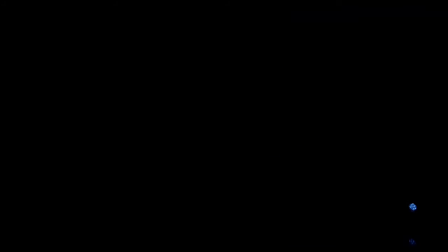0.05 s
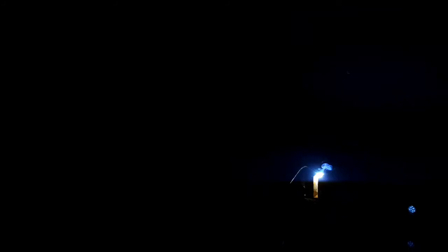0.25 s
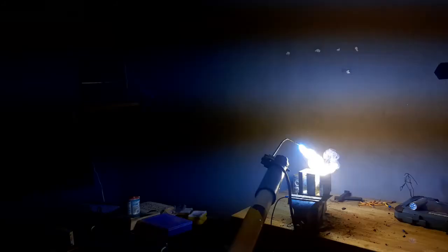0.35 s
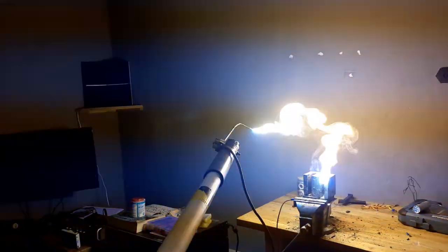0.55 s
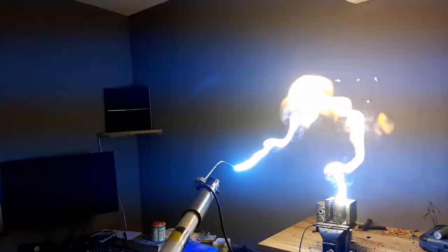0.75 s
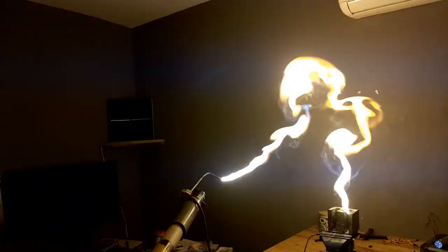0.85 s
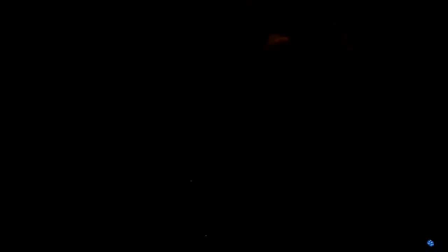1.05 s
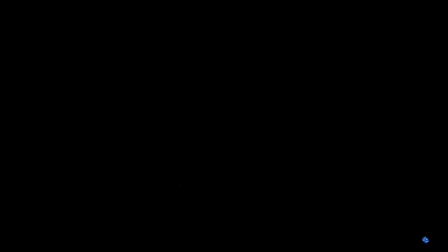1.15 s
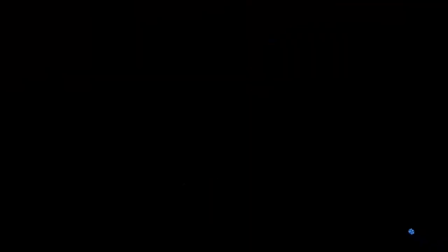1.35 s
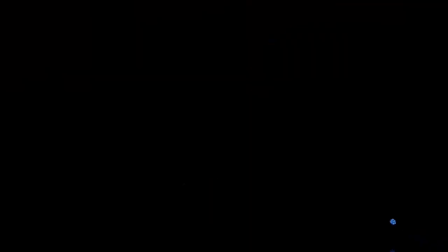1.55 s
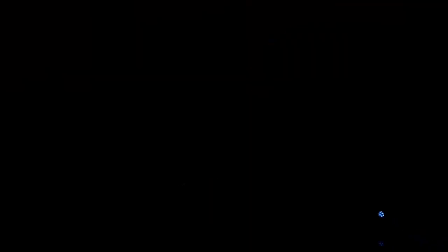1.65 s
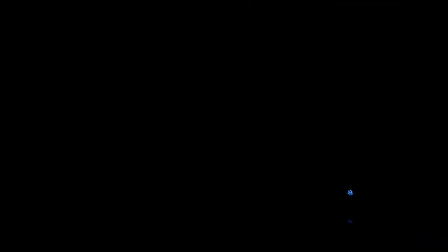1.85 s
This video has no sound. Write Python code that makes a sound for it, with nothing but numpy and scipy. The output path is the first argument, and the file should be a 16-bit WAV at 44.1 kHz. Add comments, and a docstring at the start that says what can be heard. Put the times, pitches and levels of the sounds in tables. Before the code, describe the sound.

High-voltage arc spitting, swelling into a low buzzing hum, then breaking off abruptly.

```python
"""A harsh spitting crackle as a high-voltage arc is struck in a small workshop. Drawn out, the arc grows
into a flame that hums at twice the mains frequency, its channel shrinking at every current zero. It
flutters and breaks, and the room's low modes ring on. A puff, a tick and faint rustles follow, over a
quiet transformer, a fan, room air and hiss."""
import sys
import numpy as np
from scipy import signal
from scipy.fft import rfft, irfft, next_fast_len
from scipy.io import wavfile
from scipy.ndimage import map_coordinates

SR = 44100
rng = np.random.default_rng(int(sys.argv[2]) if len(sys.argv) > 2 else 0)


def to_wav(sig):
    """Store sig (one row per channel, or 1-D mono) as 16-bit WAV at the path in sys.argv[1].

    Samples outside -1..1 are clipped; the rate is SR.
    """
    pcm = np.clip(np.atleast_2d(sig), -1, 1) * 32767
    pcm = np.round(pcm).astype(np.int16)
    wavfile.write(sys.argv[1], SR, pcm.T)  # frames by channels


N = 83790
T = np.arange(N) / SR

PULSE_HZ, CURRENT_ZERO_S = 100.0, .2176
STRIKE_S, BREAK_S, BREAK_FADE_S = .2155, .911, .021
DRAW_START_S, DRAW_END_S = 0.4, 0.66

# Each row: time in seconds, fundamental in dB, octave in dB.
HUM_LEVELS = [(0.215, -55, -49), (0.279, -33.5, -31), (0.307, -42, -34), (0.411, -24.5, -32.5),
              (0.459, -23, -36), (0.619, -13.5, -40), (0.797, -13, -26.5), (0.813, -11, -32.5),
              (0.895, -13.5, -26.5), (0.915, -15, -21.5)]
# Each row: time in seconds, level of the upper harmonics in dB.
BUZZ_LEVELS = [(.215, -57), (.255, -42.5), (.31, -46.5), (.37, -35), (.43, -30.5), (.55, -27), (.75, -25),
               (.84, -31), (.915, -26)]
# Each row, from harmonic 3 up: short-arc gain in dB, long-arc gain in dB.
BUZZ_HARMONICS = [(5, -1), (-1.5, -3.5), (-22.5, -12.5), (-7, -29), (-27, -21.5), (-29, -27.5), (-13, -31),
                  (-20.5, -34), (-26.5, -33.5), (-26.5, -36)]
WAVER_DB, WAVER_PER_HARMONIC_DB, JITTER_S, BLUR_PER_HARMONIC_RAD = 0.7, 0.21, .00002, .22


def arc_hum():
    """The hot channel shrinks at each current zero: pressure dips whose harmonics shift as it lengthens."""
    phase = 2 * np.pi * PULSE_HZ * (T - CURRENT_ZERO_S + JITTER_S * wobble(60))

    def harmonic(k, pan_db=-0.7):
        """One wavering multiple of the hum; reflections blur its phase above the octave."""
        blur = BLUR_PER_HARMONIC_RAD * max(k - 2, 0) * (rng.normal() + .3 * wobble(5))
        waver = amp((WAVER_DB + WAVER_PER_HARMONIC_DB * k) * wobble(35))
        return -waver * stereo_tone(k * PULSE_HZ, k * phase + blur, pan_db)

    fundamental_db, octave_db = curves(HUM_LEVELS)
    buzz_db, = curves(BUZZ_LEVELS)
    buzz = sum(amp(buzz_db + short_db + (long_db - short_db) * drawn_out()) * harmonic(k)
               for k, (short_db, long_db) in enumerate(BUZZ_HARMONICS, 3))
    hum = amp(fundamental_db) * harmonic(1, pan_db=-1.35) + amp(octave_db) * harmonic(2)
    return burning() * (hum + buzz)


# Each row: time in seconds, crackle in dB, fizz in dB.
SPARK_LEVELS = [(.215, -30, -16), (.24, -26, -25), (.3, -33, -29), (.335, -32, -40.5), (.38, -35, -32),
                (.47, -38, -29.5), (.53, -36, -37.5), (.6, -50, -54.5), (.66, -68, -46),
                (.73, -48.5, -43.5), (.82, -55.5, -48), (.9, -61.5, -66), (.93, -75, -52)]
SNAPS = [(0.2164, 3, -14), (0.3099, -6.5, -0.5), (0.3267, 5.5, -8), (0.3313, -3.5, -24.5), (.925, -32, -30)]
# Each row: frequency in Hz, relative level in dB.
CRACKLE_SPECTRUM = [(120, -8), (500, -5.5), (800, -5), (1000, 1), (1250, -7.5), (1500, 2.5), (2100, -1),
                    (3000, -6), (4200, -4.5), (7500, -5.5), (9000, -32.5), (16000, -20)]
FIZZ_SPECTRUM = [(800, -34.5), (2500, -16), (3800, -4), (5200, -6.5), (6200, -2.5), (7700, -4), (8500, -18),
                 (9700, -15), (11400, -7), (13500, -7), (15700, -4)]
SHORT_ARC_SPARKS_PER_S, LONG_ARC_SPARKS_PER_S = 4000, 900
SIZE_SPREAD_DB, SPURT_DB, BUNCH_DB, SPARK_WET_DB = 1, 1.15, 8, 7.5


def sparks():
    """Tiny discharges come in spurts and bunch round each re-ignition; a few snaps stand out."""
    rate = SHORT_ARC_SPARKS_PER_S * (LONG_ARC_SPARKS_PER_S / SHORT_ARC_SPARKS_PER_S) ** drawn_out()
    impulses = (rng.random(N) < rate / SR) / np.sqrt(rate)  # same power at any rate
    sizes = amp(SIZE_SPREAD_DB * np.minimum(rng.exponential(size=N), 4)) * rng.choice([-1, 1], N)
    bunch_db = BUNCH_DB * np.cos(2 * np.pi * PULSE_HZ * (T - CURRENT_ZERO_S))
    train = burning() * unit(impulses * sizes * amp(SPURT_DB * wobble(55) + bunch_db))
    crackle, fizz = [train * amp(db) for db in curves(SPARK_LEVELS)]
    for start_s, crackle_db, fizz_db in SNAPS:
        crackle[round(start_s * SR)] += amp(crackle_db)
        fizz[round(start_s * SR)] += amp(fizz_db)
    return (pan(db=-0.74) * room(colour(-crackle, CRACKLE_SPECTRUM), SPARK_WET_DB)
            + pan(db=-1.5) * room(colour(-fizz, FIZZ_SPECTRUM), SPARK_WET_DB))


# Each row: peak time in seconds, level in dB, rise and fall in seconds.
FLUTTERS = [(.238, -39.5, 0.0048, 0.028), (.47, -36.5, 0.09, 0.14), (.718, -23.5, 0.013, 0.012),
            (.922, -30.5, 0.039, 0.015)]
# Each row: frequency in Hz, relative level in dB.
FLAME_SPECTRUM = [(30, -11.5), (70, -5), (140, 0.5), (300, 2), (480, 3.5), (750, -10.5), (1400, -16.5),
                  (2500, -42.5), (8000, -71.5)]


def flame_flutter():
    """The flame roars briefly when it twists and when it tears."""
    return pan(db=-0.7) * room(swells(FLUTTERS) * noise(FLAME_SPECTRUM), wet_db=-3)


# Each row: frequency in Hz, level in dB, T60 in seconds.
ROOM_MODES = [(77.2, -37.5, 0.56), (99.5, -19.5, 0.36), (103, -21.5, 0.34), (205.3, -28, 0.3),
              (225, -34.5, .45), (295.3, -37, 0.29), (321.4, -33.5, 0.28), (400, -35.5, 0.25),
              (500, -46, .22), (621, -44.5, .22), (920, -49, 0.31)]
RING_RISE_S = 0.005


def room_ring():
    """The room's low modes die away after the break; the close pair round the hum beats."""
    age_s = np.maximum(T - BREAK_S - BREAK_FADE_S, 0)
    ring = sum((-1) ** k * amp(db - 60 * age_s / t60) * stereo_tone(hz, 2 * np.pi * hz * age_s, -1.35)
               for k, (hz, db, t60) in enumerate(ROOM_MODES))
    return ring * np.clip(age_s / RING_RISE_S, 0, 1)


# Each row: peak time in seconds, level in dB, rise and fall in seconds.
RUSTLES = [(1.001, -47, 0.0025, 0.029), (1.2, -64, 0.11, .08), (1.43, -56.5, 0.093, .03)]
TICKS = [(1.085, -54, .0004, .003)]
# Each row: frequency in Hz, relative level in dB.
RUSTLE_SPECTRUM = [(200, -7), (900, -0.5), (1800, -3.5), (3000, -11.5), (4500, -13.5), (7400, -19.5),
                   (8600, -40), (15000, -45.5)]
TICK_SPECTRUM = [(1000, -14), (3000, -2), (4500, -6), (7400, 6), (8600, -30), (15000, -22)]


def rustles_and_tick():
    """A puff, a light tick and faint rustling once the arc is out."""
    rustles = room(swells(RUSTLES) * noise(RUSTLE_SPECTRUM), wet_db=2)
    tick = room(swells(TICKS) * noise(TICK_SPECTRUM), wet_db=0)
    return rustles + tick


# Each row: time in seconds, air level in dB, transformer gain in dB.
BACKGROUND_LEVELS = [(0, -46, 4), (.21, -48.5, 3), (.4, -48, 7), (1.16, -52.5, -5.5), (1.25, -54, -2.5),
                     (1.6, -55, -1), (1.9, -51.5, -3)]
# Each row: time in seconds, level in dB.
HISS_LEVELS = [(0, -72.5), (.21, -70), (1.1, -67), (1.3, -73.5), (1.65, -79.5), (1.9, -78)]
# Each row: frequency in Hz, relative level in dB.
TRANSFORMER_TONES = [(100.1, -48.5), (200, -60.5), (1513, -78)]
FAN_TONES = [(171.8, -53), (343, -60.5), (514, -68), (676, -76), (852, -74.5)]
AIR_SPECTRUM = [(15, -72.5), (25, -42.5), (64, -38), (87, -15), (114, -8), (134, -22.5), (175, -8),
                (301, -17), (344, -24.5), (427, -16.5), (463, -21.5), (818, -25), (988, -28.5), (1100, -29),
                (16000, -83)]
HISS_SPECTRUM = [(1500, -26.5), (3200, -12.5), (4300, -1), (7000, -5), (8500, -27), (12000, -11),
                 (15700, -13.5)]
FAN_SAG_FRACTION, FAN_RECOVERY_S = .09, .2


def background():
    """A transformer hums; a fan slows under the arc's load and recovers; room air and thin hiss."""
    air_db, transformer_db = curves(BACKGROUND_LEVELS)
    hiss_db, = curves(HISS_LEVELS)
    transformer = amp(transformer_db) * tones(TRANSFORMER_TONES, T)
    load = np.clip((T - STRIKE_S) / (BREAK_S - STRIKE_S), 0, 1)
    load *= np.exp(-np.maximum(T - BREAK_S, 0) / FAN_RECOVERY_S)
    fan_clock_s = np.cumsum(1 - FAN_SAG_FRACTION * load) / SR
    fan = amp(air_db - air_db[-1]) * tones(FAN_TONES, fan_clock_s)
    air = unit(noise(AIR_SPECTRUM) + 1.8 * np.array([noise(AIR_SPECTRUM), noise(AIR_SPECTRUM)]))
    hiss = np.array([noise(HISS_SPECTRUM), noise(HISS_SPECTRUM)])
    return pan(db=-1.27) * (transformer + fan + amp(air_db) * air + amp(hiss_db) * hiss)


# Each row: frequency in Hz, T60 in seconds.
ROOM_DECAY = [(100, .45), (500, 0.44), (2000, 0.45), (6000, 0.28), (15000, 0.41)]
LEFT_DELAY_S = .00009


def room(x, wet_db):
    """Direct sound reaches the nearer, right microphone first; each side has its own diffuse tail."""
    hz, t, spectra = signal.stft(rng.standard_normal((2, SR // 2)), SR, nperseg=256)
    decay = amp(-60 * t / along(ROOM_DECAY, hz)[:, None])
    tail = signal.istft(spectra * decay, SR, nperseg=256)[1]
    tail *= 1 - np.exp(-T[:tail.shape[1]] / .002)
    wet = signal.fftconvolve(x[None], tail / np.linalg.norm(tail[0]), axes=1)[:, :N]
    direct = np.array([np.roll(x, round(LEFT_DELAY_S * SR)), x])
    return (direct + amp(wet_db) * wet) / np.sqrt(1 + amp(wet_db) ** 2 / 2)


# Each row: frequency in Hz, phase lead of left over right in radians.
LEFT_PHASE_LEAD = [(100, -0.72), (200, 0.012), (300, -0.5), (450, -0.52), (1000, -0.83)]


def stereo_tone(hz, phase, pan_db):
    """A low tone at two microphones, at different places in the room's standing waves."""
    half_lead = along(LEFT_PHASE_LEAD, hz) / 2
    return pan(pan_db) * np.sqrt(2) * np.cos(phase + np.array([[half_lead], [-half_lead]]))


def burning():
    """1 while the arc is alight."""
    return np.clip((T - STRIKE_S) / 0.0017, 0, 1) * np.clip(1 - (T - BREAK_S) / BREAK_FADE_S, 0, 1)


def drawn_out():
    """0 for the short arc, 1 for the long one."""
    return np.clip((T - DRAW_START_S) / (DRAW_END_S - DRAW_START_S), 0, 1)


def tones(rows, clock_s):
    """Sum of sines, each wavering in level."""
    return sum(amp(db + .9 * wobble(8.37)) * np.sqrt(2) * np.sin(2 * np.pi * (hz * clock_s + rng.random()))
               for hz, db in rows)


def swells(rows):
    """Envelope of exponential bursts, summed in power."""
    return np.sqrt(sum((amp(db) * np.exp(np.minimum((T - peak_s) / rise_s, (peak_s - T) / fall_s))) ** 2
                       for peak_s, db, rise_s, fall_s in rows))


def colour(x, spectrum):
    """Minimum-phase filter of unit energy."""
    size = 4096
    cepstrum = irfft(np.log(amp(along(spectrum, np.fft.rfftfreq(size, 1 / SR)))))
    cepstrum[1:size // 2] *= 2
    cepstrum[size // 2 + 1:] = 0
    kernel = irfft(np.exp(rfft(cepstrum)))
    return signal.fftconvolve(x, kernel / np.linalg.norm(kernel))[:N]


def noise(spectrum):
    """Coloured noise of rms 1."""
    return unit(colour(rng.standard_normal(N), spectrum))


def wobble(knots_per_s):
    """Smooth random curve."""
    return map_coordinates(rng.standard_normal(1000), [T * knots_per_s], mode="wrap")


def curves(rows):
    """One value per sample for each column after the time."""
    times_s, *columns = np.transpose(rows)
    return [np.interp(T, times_s, column) for column in columns]


def along(points, hz):
    """Interpolate (Hz, value) points on a log axis."""
    knots_hz, values = np.transpose(points)
    return np.interp(np.log(hz + 1), np.log(knots_hz + 1), values)


def pan(db):
    """Left and right gains; negative dB leans right."""
    return amp([[db], [-db]])


def amp(db):
    """Decibels to gain."""
    return 10 ** (np.asarray(db) / 20)


def unit(x):
    """Scale to rms 1."""
    return x / np.sqrt(np.mean(x ** 2) + 1e-20)


def scene():
    """The arc and the workshop round it."""
    return arc_hum() + sparks() + flame_flutter() + room_ring() + rustles_and_tick() + background()


def record(dry):
    """Steep low-pass with a raised-cosine edge."""
    stop_hz, edge_hz = 16100, 400
    size = next_fast_len(N + SR // 2)
    edge = np.clip((stop_hz - np.fft.rfftfreq(size, 1 / SR)) / edge_hz, 0, 1)
    return irfft(rfft(dry, size) * np.sin(np.pi / 2 * edge) ** 2, size)[:, :N]


dry = scene()
out = record(dry)
to_wav(out)
```